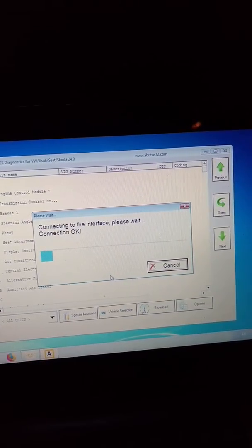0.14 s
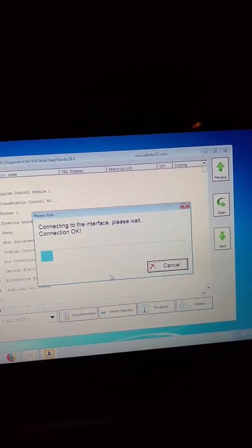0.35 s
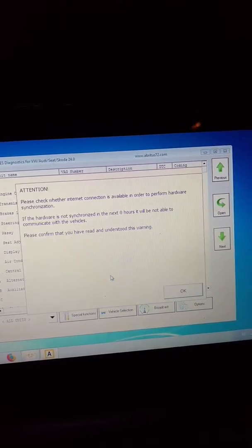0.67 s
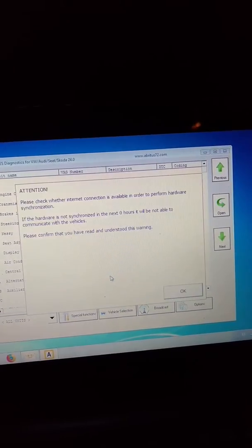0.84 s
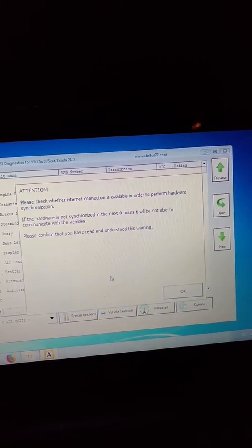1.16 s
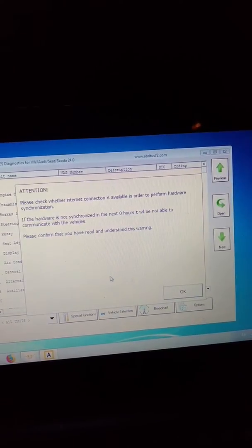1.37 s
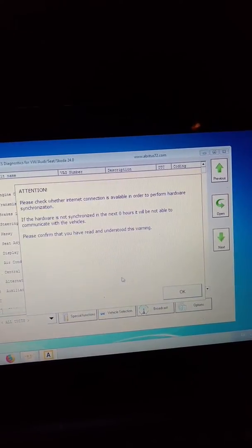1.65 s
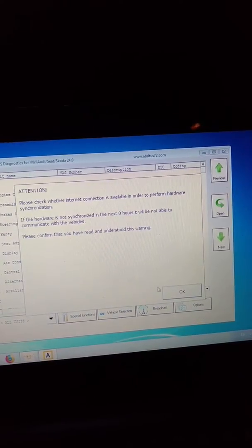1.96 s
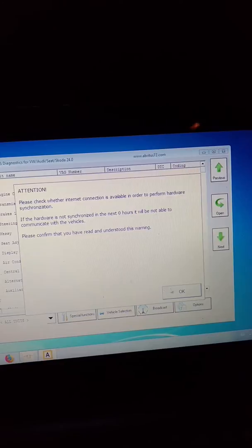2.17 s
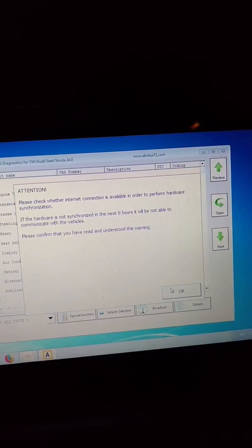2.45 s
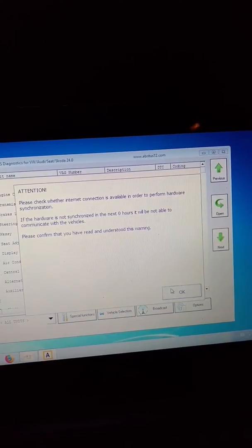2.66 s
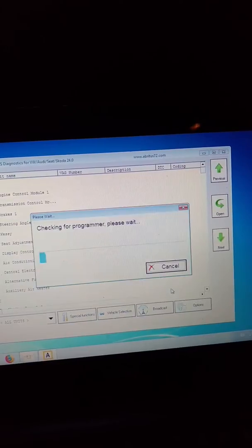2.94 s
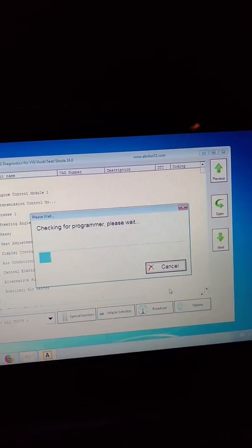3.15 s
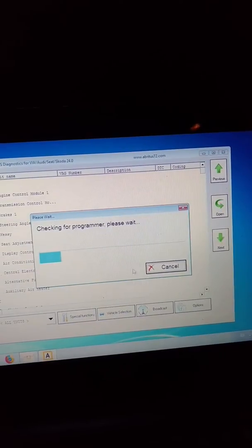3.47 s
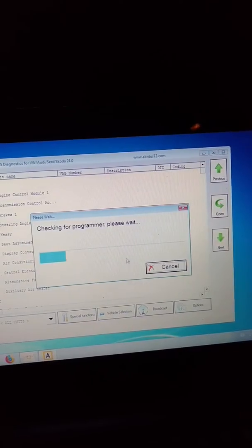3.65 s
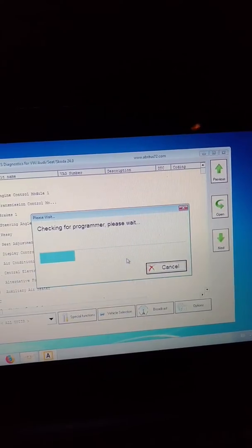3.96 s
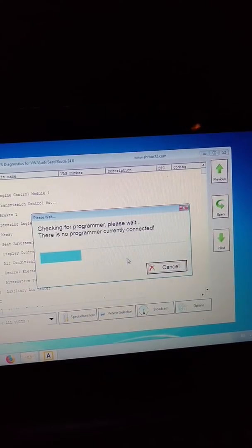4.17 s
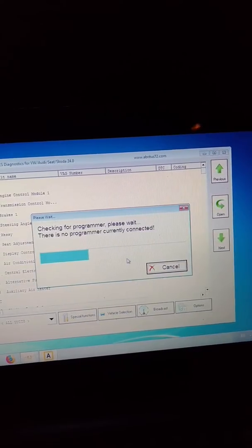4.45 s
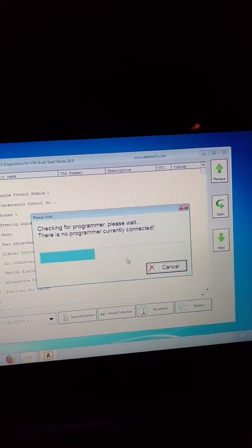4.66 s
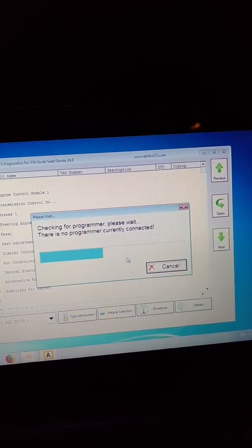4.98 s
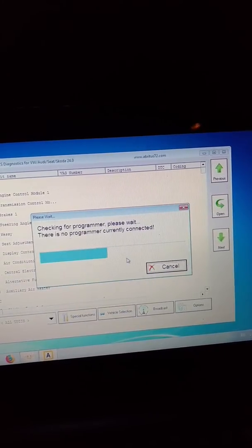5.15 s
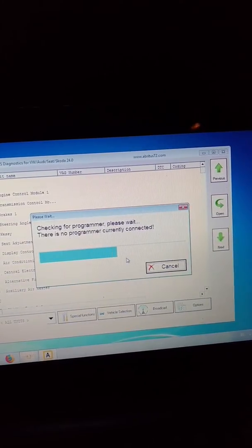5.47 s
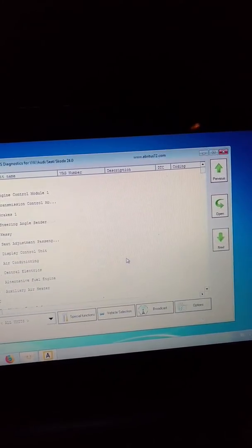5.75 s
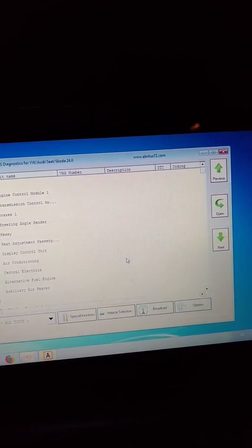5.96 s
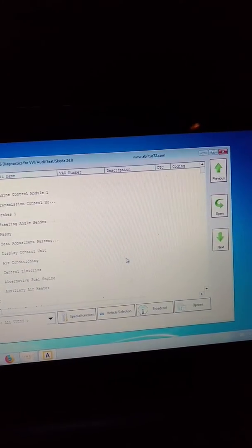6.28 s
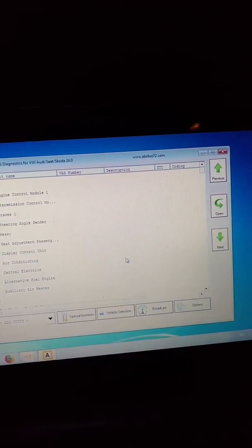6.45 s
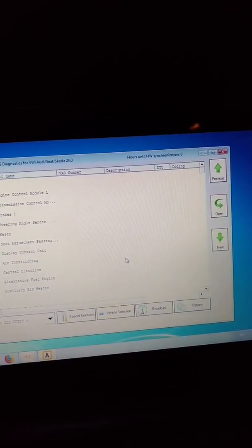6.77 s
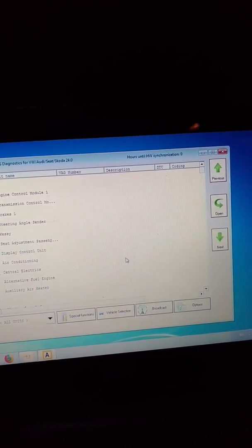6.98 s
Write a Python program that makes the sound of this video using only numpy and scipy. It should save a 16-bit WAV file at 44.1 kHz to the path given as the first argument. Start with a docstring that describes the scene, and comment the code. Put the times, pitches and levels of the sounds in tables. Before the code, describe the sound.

A faint laptop hum with thin wavering whines and soft fan air, light finger bumps, and one sharp plastic button click.

```python
"""A quiet space where a laptop runs: motor tones hum and whine over filtered noise, the soft rush of air.
A thin electrical sizzle comes in bursts of noise, and the electronics tick at a regular interval.
A button snaps once, ringing its case modes with a crack and rattle, close to a hand-held phone,
whose limiter ducks the hum and slowly lets it back.
Fingers tick and brush on the laptop and bump the phone: pushes ring through bodies, noise swells at a brush."""
import sys
import numpy as np
from scipy import signal
from scipy.fft import rfft, irfft, next_fast_len
from scipy.io import wavfile
from scipy.ndimage import uniform_filter1d, minimum_filter1d, map_coordinates

SR = 44100
rng = np.random.default_rng(int(sys.argv[2]) if len(sys.argv) > 2 else 0)


def to_wav(s):
    """Save 16-bit WAV."""
    ch = np.atleast_2d(s).T  # columns
    pcm = np.round(np.clip(ch, -1, 1) * 32767)  # PCM
    wavfile.write(sys.argv[1], SR, pcm.astype(np.int16))


N = 313992
T = np.arange(N) / SR


def amp(db):
    """Decibels to gain."""
    return 10 ** (np.asarray(db) / 20)


def unit(x):
    """Scale to rms 1."""
    return x / np.sqrt(np.mean(x ** 2) + 1e-20)


def along(points, hz):
    """Interpolate (f/Hz, value) points on a log frequency axis."""
    f, values = np.transpose(points)
    return np.interp(np.log(hz + 1), np.log(f + 1), values)


def curves(rows):
    """One value per sample for each column after the time."""
    times, *columns = np.transpose(rows)
    return [np.interp(T, times, column) for column in columns]


def wobble(rate):
    """A smooth random curve through rate normal-distributed knots a second."""
    knots = rng.standard_normal(int(N * rate / SR) + 4)
    return map_coordinates(knots, [T * rate])


def held(start, end, fade):
    """Rise, hold at 1 and fall; start and end lie halfway up the slopes."""
    return np.clip(.5 + np.minimum(T - start, end - T) / fade, 0, 1)


def burst(start, db, t60):
    """A sudden start that dies away by 60 dB in t60 seconds."""
    age = np.maximum(T - start, 0)
    return (T > start) * amp(db - 60 * age / t60)


def filtered(x, response):
    """Filter x by a complex response of frequency, padded to leave room for the tail."""
    size = 2 * next_fast_len(N // 2 + 4096)
    spectrum = rfft(x, size) * response(np.fft.rfftfreq(size, 1 / SR))
    return irfft(spectrum, size)[..., :N]


def pushes(rows):
    """One single-sample push for each (t/s, level/dB)."""
    times, db = np.transpose(rows)
    return np.bincount(np.round(times * SR).astype(int), amp(db), N)[:N]


def knocks(rows, body):
    """Sharp pushes ring through a body with a causal, minimum-phase response."""
    def response(hz):
        cepstrum = irfft(np.log(amp(along(body, hz))))
        half = len(cepstrum) // 2
        # folding the cepstrum onto positive time gives the minimum phase
        folded = np.r_[cepstrum[0], 2 * cepstrum[1:half]]
        return np.exp(rfft(folded, 2 * half))
    return filtered(pushes(rows), response)


def pan(db):
    """Left and right gains for a left-minus-right level difference."""
    return amp([[db / 2], [-db / 2]])


WIDEN_S = .000388  # delay of the phone's stereo widening


def widening_delay(hz):
    """The frequency response of the late copy used in stereo widening."""
    return np.exp(-2j * np.pi * hz * WIDEN_S)


def noise(spectrum, alike, feed=0.84):
    """Stereo noise of rms 1, its mid and side weighted by channel likeness and the phone's stereo widening."""
    def response(hz):
        late = feed * widening_delay(hz)
        likeness = np.clip(along(alike, hz), -.99, .99)
        mid_weight = np.sqrt(1 + likeness) * abs(1 - late)
        side_weight = np.sqrt(1 - likeness) * abs(1 + late)
        weights = np.array([mid_weight, side_weight])
        return amp(along(spectrum, hz)) * weights / np.linalg.norm(weights, axis=0)
    mid, side = filtered(rng.standard_normal((2, N)), response)
    return unit(np.array([mid + side, mid - side]))


def from_right(x, feed_db):
    """A sound at the right port; stereo widening gives the left a late, inverted copy."""
    copy = filtered(x, widening_delay)
    return np.array([-amp(feed_db) * copy, x])


SWELL_START_S, SWELL_END_S, SWELL_FADE_S = 1.33, 4.6, 0.16


def swell():
    """The shared swell of air and hum: it rises once, holds at 1 and sinks back to 0."""
    return held(SWELL_START_S, SWELL_END_S, SWELL_FADE_S)


# how far the left port leads the right: f/Hz, phase lead/rad
TONE_LEAD = [(300, 1), (800, -1.2), (1050, -0.2), (1450, 0.5), (1900, -1.74), (2100, -4)]


def tone(hz, db, pan_db, drift):
    """One line of a rotor, whose speed drifts very slightly; drift scales its phase wander in radians."""
    phase = 2 * np.pi * (hz * T + rng.random()) + drift * wobble(2.04)
    half_lead = along(TONE_LEAD, hz) / 2
    ports = np.sin([phase + half_lead, phase - half_lead])
    return np.sqrt(2) * amp(db) * pan(pan_db) * ports  # a sine of rms 1 before its level and pan


ROTOR_HZ = 208.75
# rotor orders of the two strong whines: multiple of the rotor frequency
WHINE_ORDERS = [5, 6]
# stereo place of each strong whine: left-right level/dB
WHINE_PAN = [2.4, -1.9]
# swell and fade as the phone drifts through standing waves: t/s, fifth-order level/dB, sixth-order level/dB
WHINE_LEVELS = [(0, -53.0, -64), (0.45, -54.5, -71), (1.45, -57, -57.5), (1.9, -58, -56.5),
                (3.15, -53.5, -55.5), (4.2, -50, -59), (5.6, -54, -61.5), (6.55, -67.5, -59),
                (7.1, -80, -61)]


def strong_whines():
    """The rotor's fifth and sixth orders swell and fade separately."""
    lines = zip(WHINE_ORDERS, curves(WHINE_LEVELS), WHINE_PAN)
    return sum(tone(order * ROTOR_HZ, db, side, drift=0.091) for order, db, side in lines)


DRIFT_M_PER_S = 0.028  # how fast the hand carries the phone through the standing waves
SOUND_M_PER_S = 343


def standing_wave(hz, antinode_s):
    """1 at an antinode, -1 at a node; antinodes lie half a wavelength apart, so high tones ripple faster."""
    half_waves = DRIFT_M_PER_S * (T - antinode_s) * 2 * hz / SOUND_M_PER_S
    return np.cos(2 * np.pi * half_waves)


FAINT_FLUTTER_DB, FAINT_FLUTTER_PER_S = 1.2, 5
# pitches of the faint whines: f/Hz
FAINT_HZ = [835.1, 1276.6, 1903.0, 2111.6]
# the same whines in order: starting level/dB before ripple and flutter, growth/dB per s,
# left-right level/dB, t/s when the phone passes an antinode, ripple/dB either way
FAINT_WHINES = [(-69, 0.5, 3, 2.73, 5), (-77, 1.84, -2, 6.3, 3), (-64, -0.15, -5, 4.13, 2.5),
                (-67.5, 0.98, -4.5, 4.88, 5)]


def faint_whines():
    """Faint tones ripple as the phone passes through their standing waves, with a random flutter."""
    whines = 0
    for hz, (start_db, growth, side, antinode_s, ripple_db) in zip(FAINT_HZ, FAINT_WHINES):
        ripple = ripple_db * standing_wave(hz, antinode_s)
        flutter = FAINT_FLUTTER_DB * wobble(FAINT_FLUTTER_PER_S)
        whines = whines + tone(hz, start_db + growth * T + ripple + flutter, side, drift=0.1)
    return whines


HUM_DB, HUM_SWELL_DB = -2.3, 1.5  # trim of the whole hum, and its rise with the air
# steadier motor tones: f/Hz, level/dB before trim, swell and wobble, left-right level/dB
HUM_TONES = [(339.2, -66, 4), (436.2, -72, 6), (533.1, -67, 7), (540.1, -64, -1), (602.1, -78, 7),
             (678.5, -75, 6), (810.2, -75, 3), (920.8, -71, -1), (939.4, -79, 4), (1017.7, -68, 3),
             (1080.2, -66, 0), (1211.6, -72, -1), (1228.2, -71, -1), (1437.2, -77, -5), (1461.2, -79, -2),
             (1485.7, -73, -5), (1620.3, -79, -7), (1854.7, -70, 3), (1959, -75, -11), (2063.3, -71, 6),
             (2272.0, -70.5, 0), (2530, -80, -4)]


def steady_hum():
    """A bed of steadier motor tones, where close neighbours beat, swells together with the air."""
    bed = sum(tone(hz, db + 1.0 * wobble(1.34), side, drift=0.039) for hz, db, side in HUM_TONES)
    return amp(HUM_DB + HUM_SWELL_DB * swell()) * bed


RUSH_DB, SWELL_DB = -55.5, 2.5  # resting level of the air, and its rise in the swell
# colour of the rush of air: f/Hz, relative level/dB per Hz
AIR_COLOUR = [(22, -30), (55, -3), (120, -1.5), (270, 0.74), (400, -5.5), (770, -7.5), (1050, -2.5),
              (1170, -9.5), (1600, -11.5), (2200, -11), (2600, -17), (3100, -15.5), (3600, -16.5),
              (5000, -19.5), (8200, -21.5), (15000, -33)]


def air():
    """Fan air and room rush are broadband noise, most alike at both ports in the bass."""
    alike = [(60, 0.92), (300, 0.79), (700, 0.24), (1300, 0.61), (2500, 0.14), (6000, 0.24)]
    rush_db = RUSH_DB + SWELL_DB * swell() + 0.075 * wobble(2.33)
    return amp(rush_db) * pan(-0.81) * noise(AIR_COLOUR, alike)


SIZZLE_FADE_S, SIZZLE_FLUTTER_DB = 0.24, 1.2
# bursts of sizzle: start t/s, end t/s, level/dB before flutter and pan
SIZZLE_BURSTS = [(-.1, .2, -66), (1.4, 2.38, -71.5), (2.44, 3.01, -63), (4.3, 4.608, -69),
                 (5.144, 5.362, -63.5)]
# colour of the sizzle: f/Hz, relative level/dB
SIZZLE_COLOUR = [(2800, -48), (3500, 6.5), (3800, 9), (4200, -5), (5200, -43)]


def sizzle():
    """A thin electrical sizzle is a narrow band of noise, fluttering in bursts."""
    bursts = sum(amp(db) * held(start, end, SIZZLE_FADE_S) for start, end, db in SIZZLE_BURSTS)
    flutter = amp(SIZZLE_FLUTTER_DB * wobble(25.17))
    return bursts * flutter * pan(-5.5) * noise(SIZZLE_COLOUR, [(3800, 0.089)])


POLL_FIRST_S, POLL_EVERY_S = .434, .64
POLL_DB = -20.5  # push before the body response
# response of the case to a tiny hard contact, also used for the nail ticks: f/Hz, level/dB
HARD_CONTACT = [(100, -30), (1200, -16), (2700, -11), (3450, 2.5), (4100, -5), (5000, -23), (14000, -34)]


def polling():
    """The electronics give a tiny tick, always the same, at a regular interval."""
    ticks = [(s, POLL_DB) for s in np.arange(POLL_FIRST_S, N / SR, POLL_EVERY_S)]
    return from_right(knocks(ticks, HARD_CONTACT), feed_db=-4)


# bumps on the phone: t/s, push level/dB before the body response
PHONE_BUMPS = [(1.07, -3), (1.277, -10), (1.543, 0), (1.556, 11), (1.566, -5), (3.049, -6), (3.789, -7),
               (3.823, 0.5), (6.879, -5), (6.913, -6), (6.932, 2)]
# response of the phone's body in the hand: f/Hz, level/dB
PHONE_BODY = [(15, -45), (50, 7), (100, 2), (225, 10.5), (340, -9), (470, -32), (800, -58), (4000, -60)]


def phone_bumps():
    """Fingers bump the phone, and its body passes each push on as a dull thud."""
    return from_right(knocks(PHONE_BUMPS, PHONE_BODY), feed_db=-3.5)


# light fingertip taps: t/s, push level/dB before the pad response
FINGERTIP_TAPS = [(1.2720, -3.3), (1.2753, -13), (1.8384, -7.5), (3.0385, -7.5), (3.0432, -12),
                  (3.7748, -15), (3.7917, -13), (3.7950, -13), (3.8234, -8.5)]
# response of the touch pad: f/Hz, level/dB
TOUCH_PAD = [(100, -25), (290, 0), (550, -7), (1100, -2), (1750, 1.5), (2250, -5), (2800, -17), (3500, -27),
             (8000, -48)]
# sharper fingernail ticks: t/s, push level/dB before the case response
NAIL_TICKS = [(3.0390, -17.5), (3.7703, -21), (3.7925, -21), (3.8175, -20), (3.8222, -14), (7.079, -22)]


def finger_taps():
    """Fingertips push the touch pad; nails make harder, brighter contacts on the case."""
    taps = knocks(FINGERTIP_TAPS, TOUCH_PAD) + knocks(NAIL_TICKS, HARD_CONTACT)
    return from_right(taps, feed_db=-3)


CATCHES_PER_S, CATCH_DB = 500, 4  # how often skin catches and slips, and how unevenly
# finger brushes: t/s of the middle, level/dB before catching and pan, bell width (standard deviation)/s
BRUSHES = [(1.546, -51, .005), (1.567, -55, .0047), (2.33, -65, .0046), (3.040, -46, .004),
           (3.049, -50, .008), (3.777, -52, .006), (3.793, -47.5, .009), (3.821, -52.5, .007),
           (7.08, -57, .0051)]
# colour of skin on the laptop: f/Hz, relative level/dB
SKIN_COLOUR = [(100, 5), (300, 5), (900, 6), (1800, 7.5), (3600, 4), (5500, -14), (14000, -22)]


def finger_brushes():
    """Skin catches and slips as it brushes: bell-shaped swells of noise with a fast, uneven level."""
    swells = sum(amp(db) * np.exp(-.5 * ((T - s) / width) ** 2) for s, db, width in BRUSHES)
    catching = unit(amp(CATCH_DB * wobble(CATCHES_PER_S)))
    return pan(-1.6) * swells * catching * noise(SKIN_COLOUR, [(300, 0.98), (3000, 0.082)])


RUMBLE_START_S, RUMBLE_DB, RUMBLE_T60_S = 1.557, -51.5, .24
# colour of the low rumble: f/Hz, relative level/dB
RUMBLE_COLOUR = [(20, -22), (50, 2), (85, 1), (150, -25), (400, -70)]


def rumble():
    """The phone shakes briefly in the hand after the hardest bump: low noise that dies away."""
    low_noise = filtered(rng.standard_normal(N), lambda hz: amp(along(RUMBLE_COLOUR, hz)))
    return burst(RUMBLE_START_S, RUMBLE_DB, RUMBLE_T60_S) * unit(low_noise)


CONTACT_S = .0002  # time constant of the ring's onset
TRAVEL_S = .0005  # the button bottoms out this long after the press
CRACK_DB, CRACK_T60_S, RATTLE_DB, RATTLE_T60_S = -30.5, .018, -23, .062  # rattle before pan
# the press, then the case settling: t/s, push level/dB
PRESS = [(2.1309, 7.8), (2.1368, -18), (2.1425, -25)]
# modes of the button and its plastic case: f/Hz, level/dB for a 0 dB push, t60/s
BUTTON_MODES = [(251, -33.2, .048), (341, -32.5, .048), (620, -28, .0141), (962, -19.3, .0165),
                (1422, -18.8, .0181), (1731, -1.6, .0104), (1982, 4.6, .0056), (2518, -8.5, .0091),
                (2787, -13.3, .0093), (3428, -10.6, .011), (3655, -16.5, .022), (4067, -3.9, .0057),
                (4603, -20.8, .0091), (6531, -24.6, .0063)]
# colour of the thin crack: f/Hz, relative level/dB
CRACK_COLOUR = [(3000, -40), (6600, 2), (9000, -4), (12300, 3), (15000, -10)]
# colour of the case rattle: f/Hz, relative level/dB
RATTLE_COLOUR = [(50, -22), (110, -4), (210, 4), (500, 4.5), (880, 1), (1150, 0), (1900, 2), (2800, -7),
                 (3600, 1), (5200, -20), (9000, -22), (15000, -27)]


def button():
    """A hard plastic snap rings decaying modes; a thin crack and a short rattle go with it."""
    t = T[:SR // 10]
    ring = 0
    for k, (hz, db, t60) in enumerate(BUTTON_MODES):
        sign = (-1) ** k  # neighbouring modes swing opposite ways
        ring = ring + sign * amp(db - 60 * t / t60) * np.sin(2 * np.pi * hz * t)
    onset = 1 - np.exp(-t / CONTACT_S)
    snap = signal.fftconvolve(pushes(PRESS), ring * onset)[:N]
    bottom_s = PRESS[0][0] + TRAVEL_S
    crack = burst(bottom_s, CRACK_DB, CRACK_T60_S) * noise(CRACK_COLOUR, [(8000, .1)])
    rattle = burst(bottom_s, RATTLE_DB, RATTLE_T60_S) * noise(RATTLE_COLOUR, [(300, .6), (3000, .1)])
    return from_right(snap, feed_db=-3.7) + crack + pan(-3) * rattle


def scene():
    """Everything that reaches the phone."""
    laptop = strong_whines() + faint_whines() + steady_hum() + air() + sizzle() + polling()
    handling = phone_bumps() + finger_taps() + finger_brushes() + rumble()
    return laptop + handling + button()


def limit(x, ceiling=.93, release_db_per_s=9.2):
    """The gain drops just ahead of a peak and climbs back at a steady rate in dB."""
    over_db = 20 * np.log10(np.maximum(abs(x).max(axis=0) / ceiling, 1))
    ahead_db = -minimum_filter1d(-over_db, size=89)  # a running maximum, about 1 ms to either side
    release_db = release_db_per_s * T
    cut_db = np.maximum.accumulate(ahead_db + release_db) - release_db
    return x * amp(-uniform_filter1d(cut_db, size=45))


TOP_HZ = 15100


def record(dry):
    """The phone's limiter, then its sharp upper band limit."""
    return filtered(limit(dry), lambda hz: hz < TOP_HZ)


dry = scene()
out = record(dry)
to_wav(out)
```